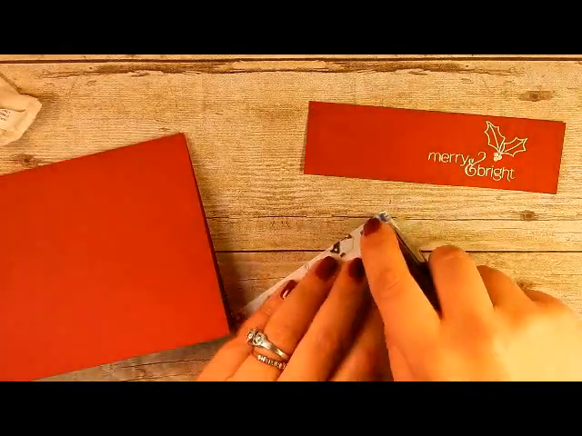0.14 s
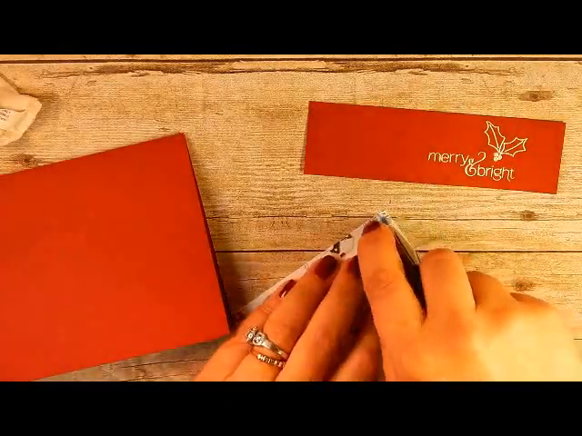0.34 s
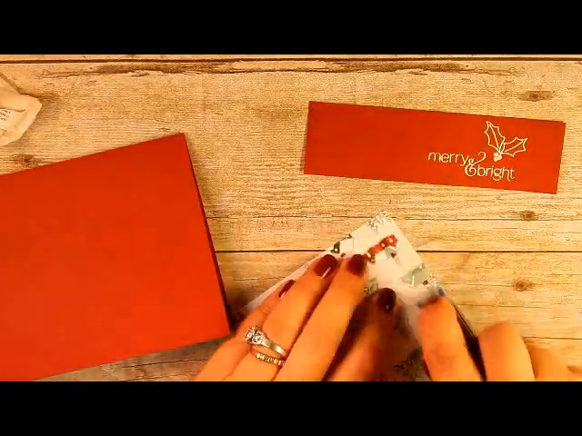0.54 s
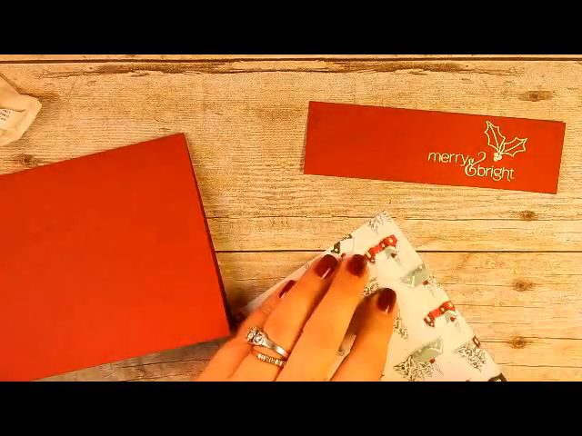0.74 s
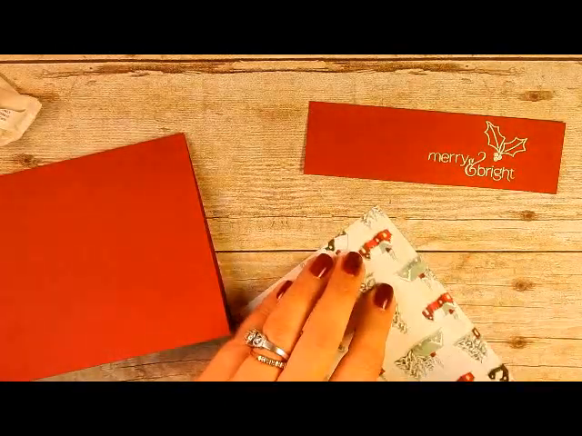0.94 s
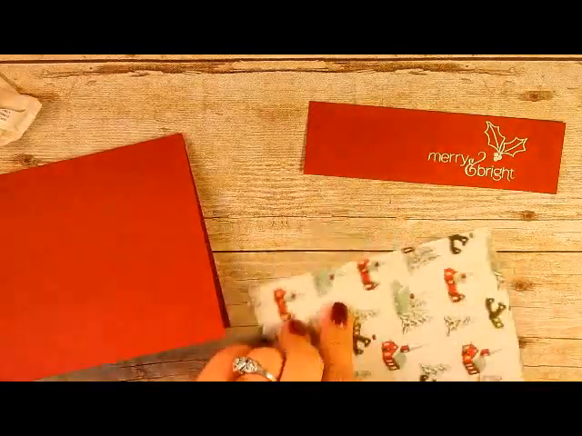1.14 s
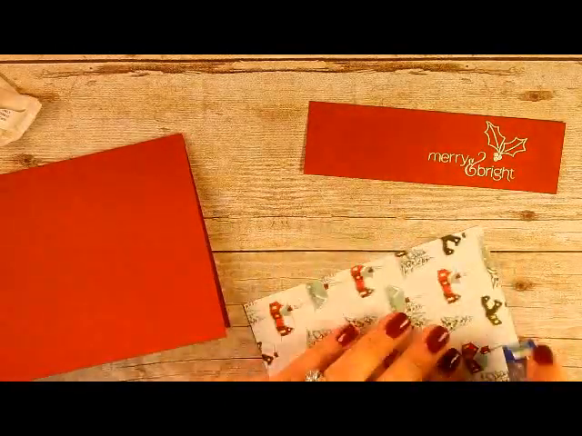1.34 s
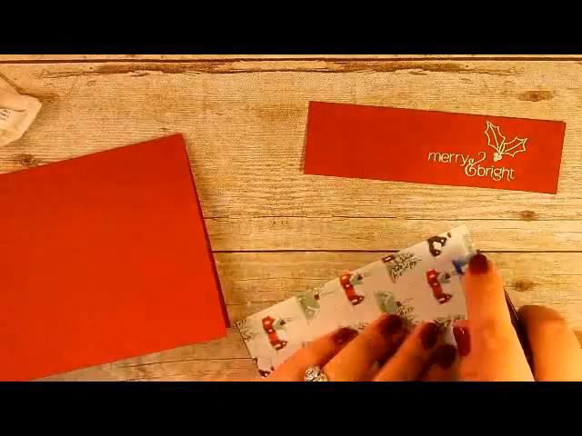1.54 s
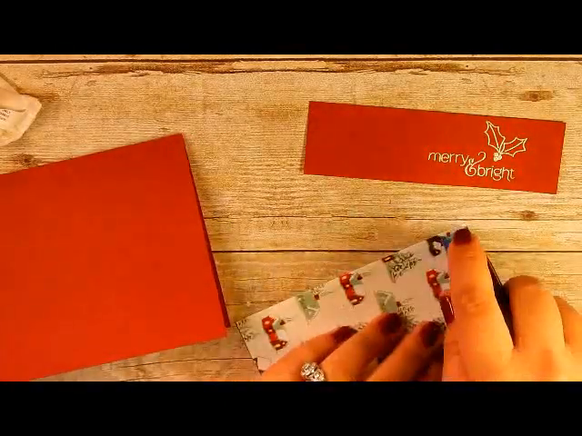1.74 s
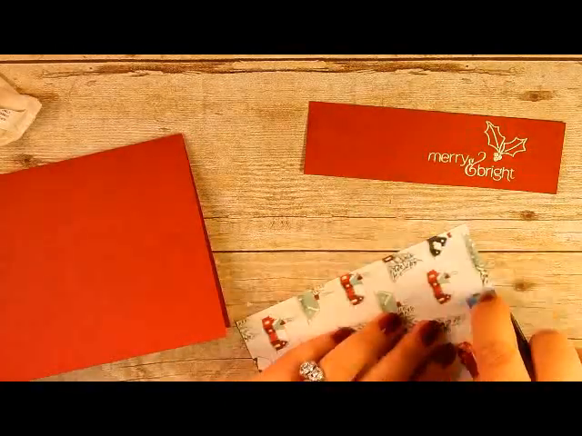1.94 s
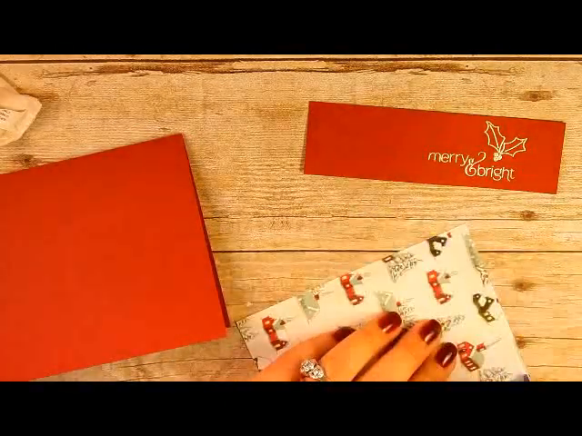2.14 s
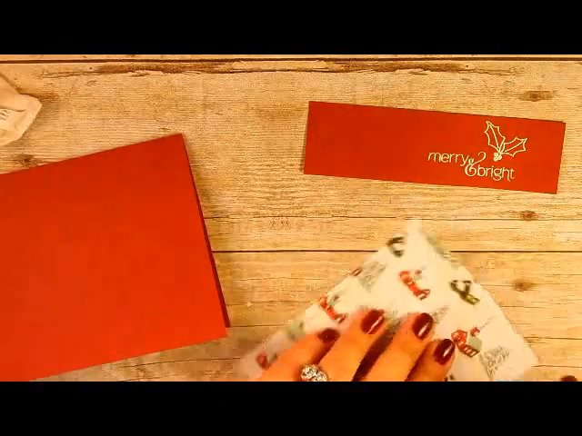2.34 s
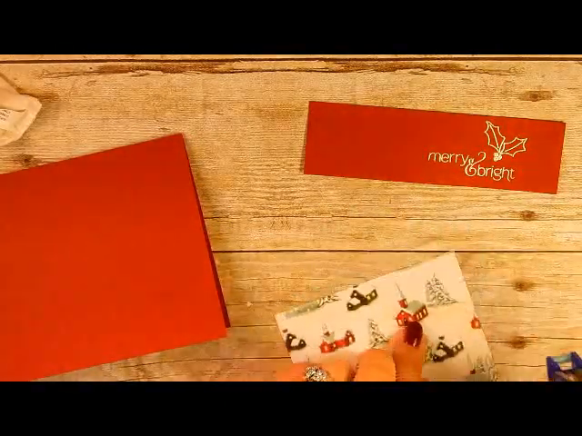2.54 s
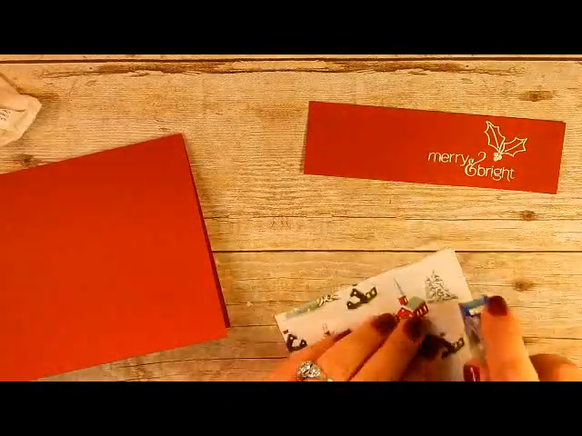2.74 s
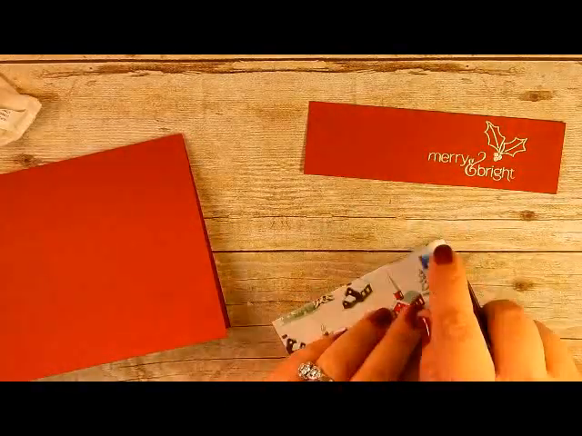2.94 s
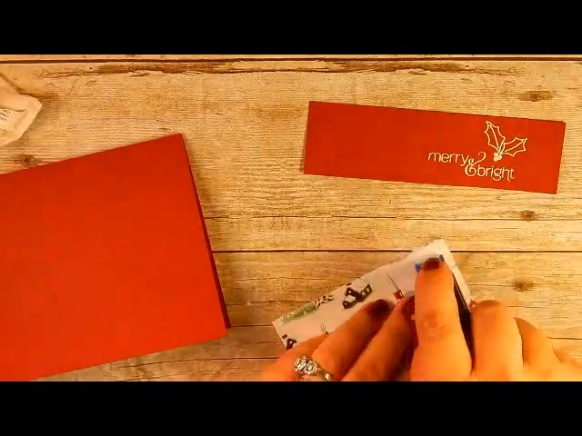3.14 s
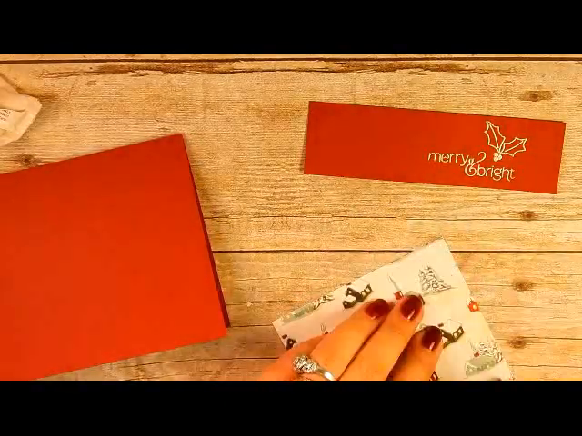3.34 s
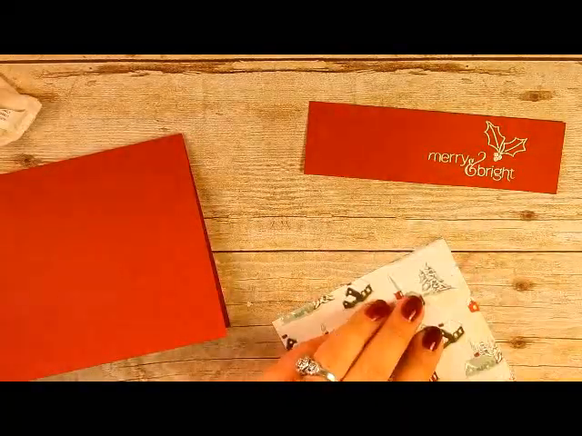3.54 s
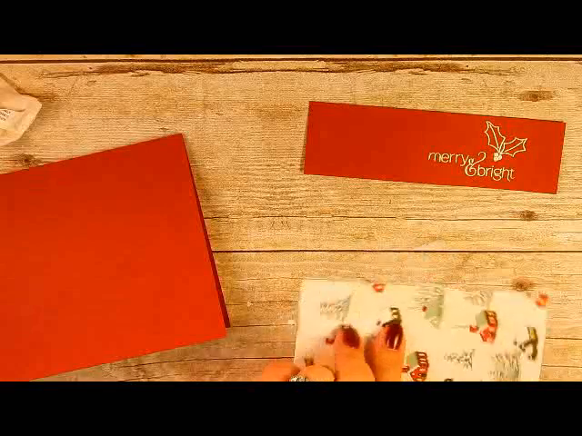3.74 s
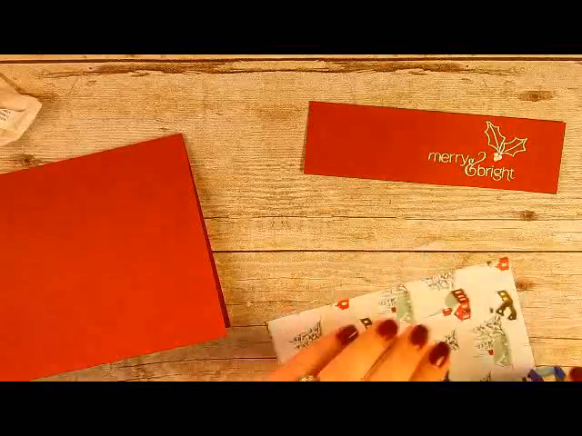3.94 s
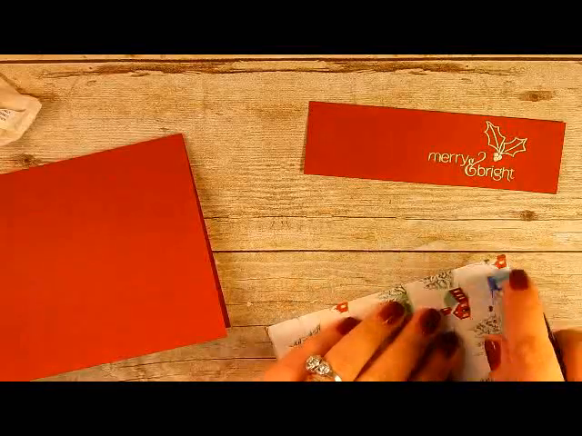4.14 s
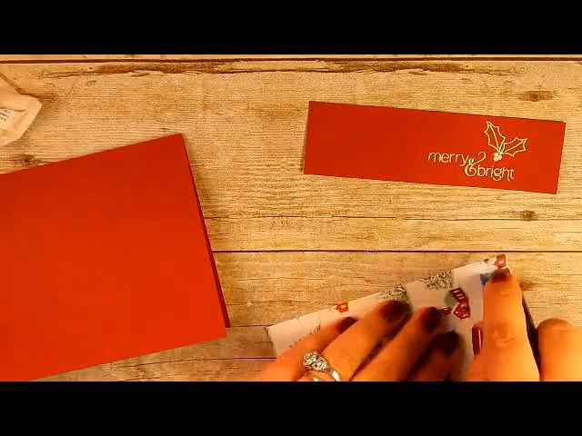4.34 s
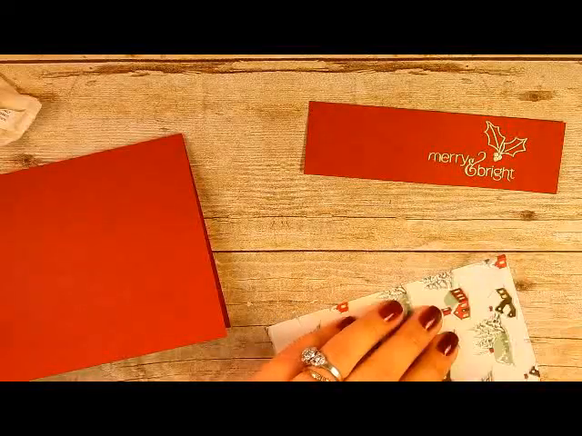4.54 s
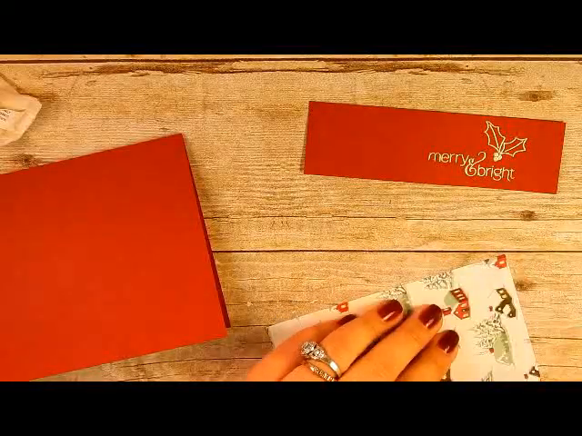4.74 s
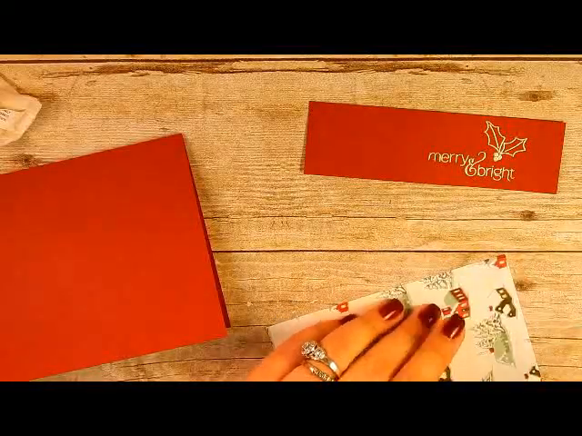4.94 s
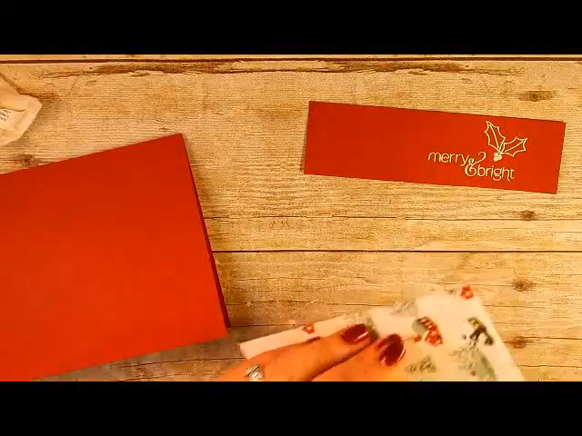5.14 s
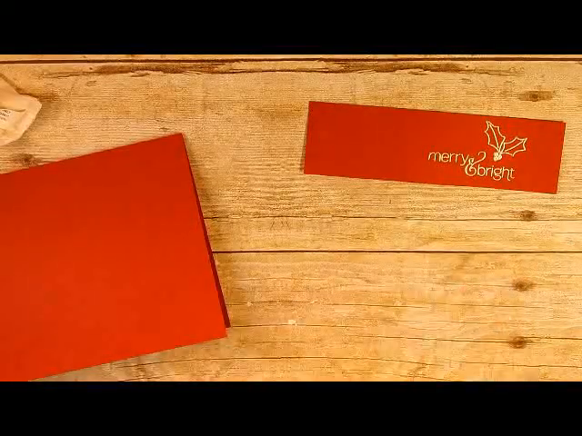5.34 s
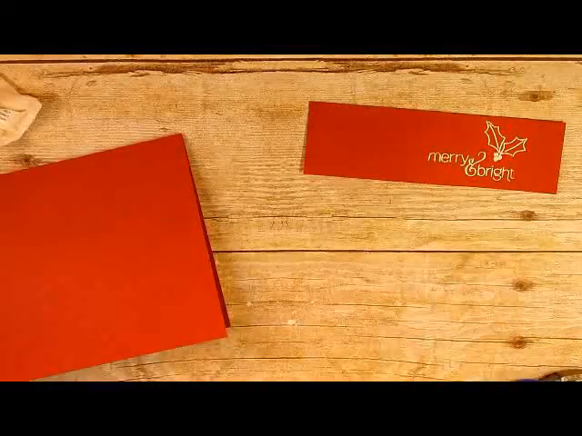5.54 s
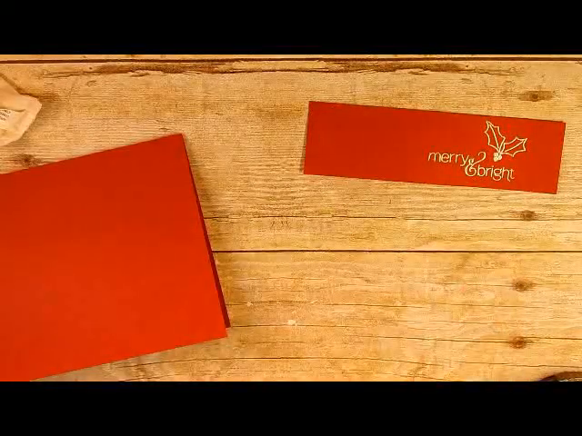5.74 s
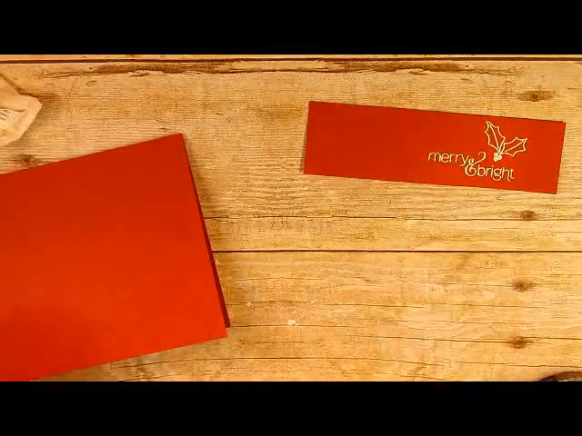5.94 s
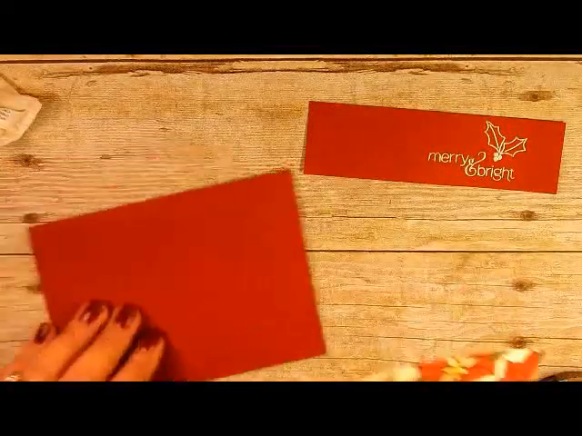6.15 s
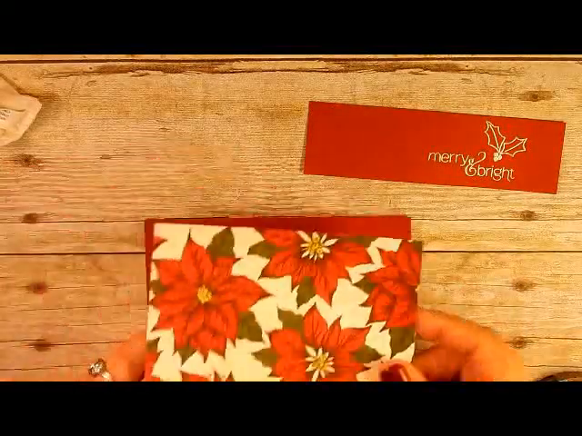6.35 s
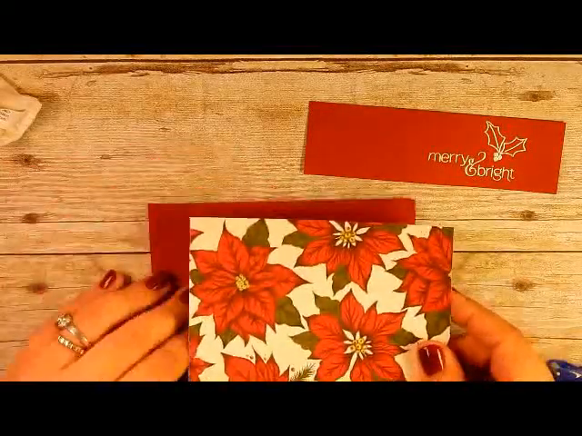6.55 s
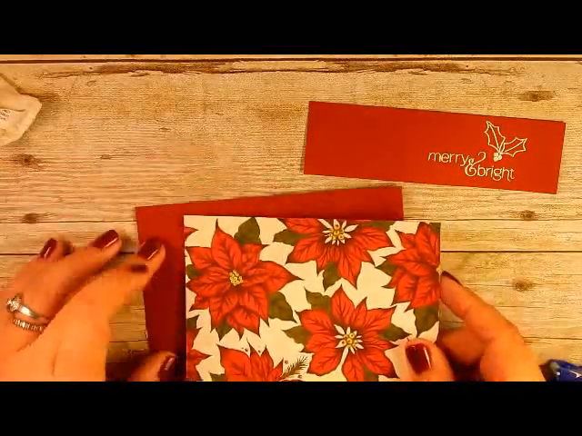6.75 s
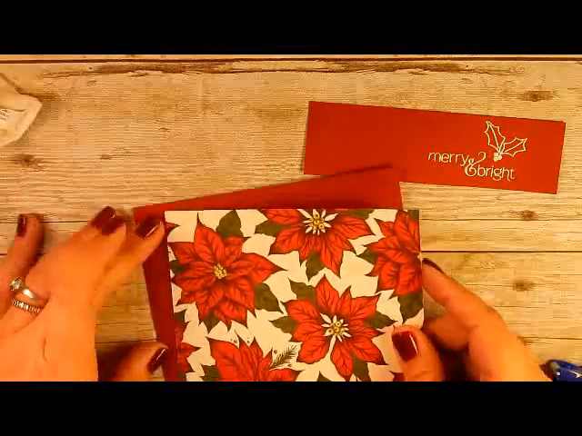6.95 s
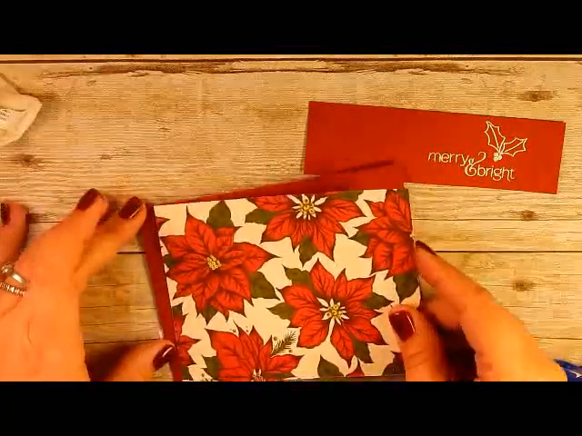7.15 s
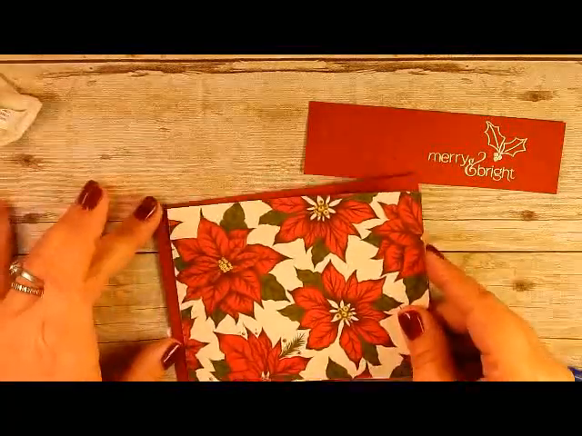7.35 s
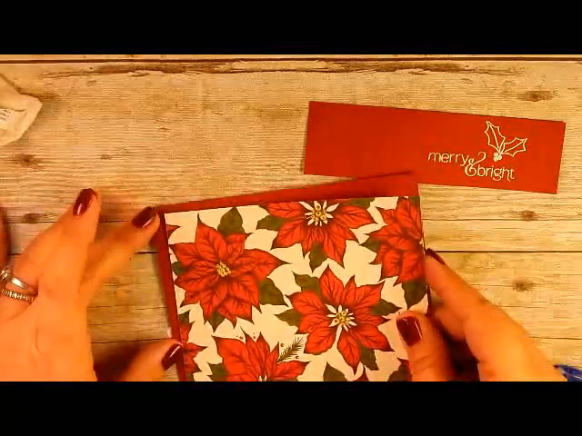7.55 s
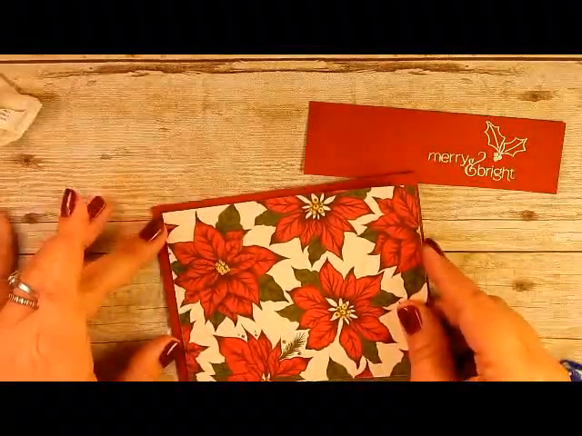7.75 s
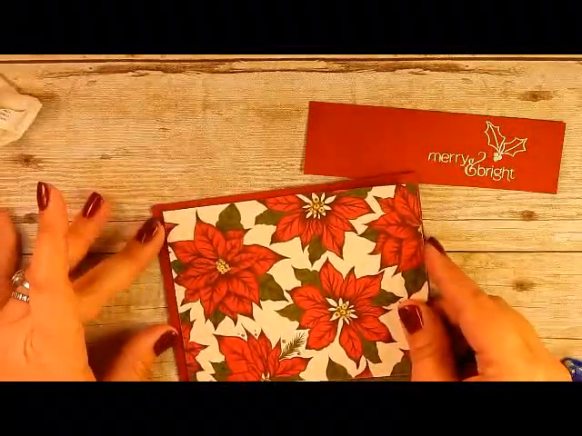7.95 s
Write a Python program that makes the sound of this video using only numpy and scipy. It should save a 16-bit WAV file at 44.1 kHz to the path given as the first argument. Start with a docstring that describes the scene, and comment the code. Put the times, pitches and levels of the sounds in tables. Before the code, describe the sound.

Very close in a small quiet room, a hollow plastic tape runner makes four brief ratcheting zips across paper, about a second apart, with light clicks and soft paper rustles between them. It is then dropped onto a wooden desk in a loud, quick clatter. Card taps and rubs the wood, paper swishes over card, and faint nudging rustles follow before a final soft thud.

```python
"""Card making at a desk

A plastic tape runner is pulled over a paper panel in four strokes, close to the microphone in a small room.
Noise shaped by gear teeth and adhesive rings through casing resonances; blows ring the struck bodies and the desk.
The panel is turned between strokes by clumped friction noise. Then the runner is put down on the wooden desk,
and the panel is slid onto a folded card and nudged into line, over quiet room air and a low hum."""
import sys
import numpy as np
from scipy import signal
from scipy.fft import rfft, irfft, next_fast_len
from scipy.io import wavfile
from scipy.ndimage import uniform_filter1d, map_coordinates

SR = 44100
rng = np.random.default_rng(int(sys.argv[2]) if len(sys.argv) > 2 else 0)


def dump_mix(stems):
    """Bounce the given channels to the path in sys.argv[1] as a 16-bit WAV at rate SR."""
    frames = np.atleast_2d(stems).T  # one column per channel
    limited = np.clip(frames, -1, 1)  # hard clip at full scale
    pcm = np.round(limited * 32767).astype(np.int16)
    wavfile.write(sys.argv[1], SR, pcm)


N = 352800
TIME = np.arange(N) / SR  # seconds
HZ = np.fft.rfftfreq(8192, 1 / SR)  # frequency grid of the resonant bodies


def amp(db):
    """Level: decibels to amplitude gain."""
    return 10 ** (np.asarray(db) / 20)


def unit(x):
    """Normalisation: scale to rms 1."""
    return x / np.sqrt(np.mean(x ** 2) + 1e-20)


def along(points, hz):
    """Logarithmic pitch: read (Hz, value) points on a log frequency axis."""
    point_hz, values = np.transpose(points)
    return np.interp(np.log(hz + 1), np.log(point_hz + 1), values)


def wobble(rate):
    """Slow modulation: a smooth random curve with rate knots a second."""
    knots = rng.standard_normal(int(N * rate / SR) + 4)
    return map_coordinates(knots, [TIME * rate])


def filtered(x, response):
    """Linear filtering: multiply the spectrum of x by a function of frequency."""
    size = next_fast_len(N + SR // 4)
    spectrum = rfft(x, size) * response(np.fft.rfftfreq(size, 1 / SR))
    return irfft(spectrum, size)[..., :N]


def coloured(x, spectrum):
    """Spectral shaping: x weighted by the given spectrum, at rms 1."""
    return unit(filtered(x, lambda hz: amp(along(spectrum, hz))))


def peaks(modes):
    """Modal resonance: summed power response of the modes; width is the full width at half power."""
    return sum(amp(db) ** 2 / (1 + (2 * (HZ - hz) / width) ** 2) for hz, width, db in modes)


def ringing(gain):
    """Minimum phase: the causal impulse response of energy 1 shaped by the gain on HZ."""
    cepstrum = irfft(np.log(np.maximum(gain / gain.max(), 1e-5)))
    # folding the cepstrum onto positive times makes the response causal
    cepstrum[1:len(HZ) - 1] *= 2
    cepstrum[len(HZ):] = 0
    ring = irfft(np.exp(rfft(cepstrum)))
    return ring / np.linalg.norm(ring)


def burst(t60, attack=0.0015):
    """Exponential decay: a dying noise of tiny contacts, of energy 1; times in seconds."""
    t = TIME[:SR // 5]
    decay = amp(-60 * t / max(t60, .002))
    x = rng.standard_normal(len(t)) * decay * (1 - np.exp(-t / attack))
    return x / np.linalg.norm(x)


def chatter(t60, clump_db=4, clump_rate=450):
    """Repeated impact: a burst broken into uneven rebounds, of energy 1."""
    x = burst(t60, attack=0.0016)
    knots = rng.uniform(-1, 1, 400)
    clumps = np.interp(TIME[:len(x)] * clump_rate, np.arange(len(knots)), knots)
    x = x * amp(clump_db * clumps)
    return x / np.linalg.norm(x)


def add(track, s, sound):
    """Superposition: mix a sound in at time s."""
    part = track[max(round(s * SR), 0):][:len(sound)]
    part += sound[:len(part)]


def patchy(x, depth_db, size):
    """Spectral fluctuation: bands swell and fade while loudness holds; size = (bins, frames) of a patch."""
    z = signal.stft(x, nperseg=512)[2]
    field = rng.standard_normal(z.shape)
    for _ in range(2):
        field = uniform_filter1d(field, size[0], axis=0)
        field = uniform_filter1d(field, size[1], axis=1)
    gain = amp(depth_db * unit(field))
    gain = gain / np.sqrt(uniform_filter1d(gain ** 2, size=25, axis=0))
    return signal.istft(z * gain, nperseg=512)[1][:N]


def swell(start, length, rise, fall):
    """Speed of the hand, 0 to 1: it gathers speed, holds and slows to rest."""
    up = np.clip((TIME - start) / rise, 0, 1)
    down = np.clip((start + length - TIME) / fall, 0, 1)
    return np.sin(np.pi / 2 * up) * np.sin(np.pi / 2 * down)


def movements(table):
    """Amplitude envelope: gain per sample of a series of hand movements."""
    return sum(amp(db) * swell(start, length, rise, fall) for start, length, db, rise, fall in table)


def friction(spectrum, grain_db=2.0):
    """Stick-slip friction: fibres catch and let go, giving noise in fine clumps at rms 1."""
    clumps = wobble(400) + 0.67 * wobble(45)
    return coloured(rng.standard_normal(N) * amp(grain_db * clumps), spectrum)


# Spectrum of the room air. Each row: frequency in Hz, relative level in dB per Hz.
AIR_SPECTRUM = [(20, -25), (45, -3), (70, -5.5), (110, -5.5), (200, -7), (350, -11), (700, -13.5),
                (1100, -16), (1500, -15.5), (1900, -18.5), (2600, -20.5), (4300, -25), (6500, -35),
                (10400, -45.5)]


def background(air_db=-59, hum_db=-66, hum_hz=60.4, apart_db=-6):
    """Diffuse field: partly independent room air at the two capsules, slightly shifting, and a low mains hum."""
    shared = coloured(patchy(rng.standard_normal(N), depth_db=.9, size=(5, 30)), AIR_SPECTRUM)
    diffuse = amp(apart_db) * coloured(rng.standard_normal((2, N)), AIR_SPECTRUM)
    hum = amp(hum_db + 3.1 * wobble(4.2)) * np.sin(2 * np.pi * hum_hz * TIME)
    return amp(air_db + 1.6 * wobble(6.2)) * (shared + diffuse) + hum


# The runner's tip or the card's edge scuffs briefly.
# Each row: middle in seconds, relative level in dB, resonance in Hz, length in seconds.
SCUFFS = [(0.23, -52, 1430, 0.044), (1.124, -44.5, 1550, 0.042), (1.91, -39, 1620, 0.038),
          (2.042, -46, 1560, 0.036), (3.238, -42.5, 1520, 0.042), (3.76, -44, 1482, 0.039),
          (4.426, -41, 1630, 0.013), (4.895, -42.5, 1450, 0.075), (5.498, -36, 1875, 0.023),
          (5.556, -21, 1380, 0.024), (5.603, -30, 1410, 0.044), (5.668, -21, 1810, 0.017),
          (5.922, -44, 1240, 0.025), (6.043, -39, 1730, 0.034), (6.09, -29, 1750, .04),
          (6.168, -54, 900, .04), (6.583, -27, 1440, 0.027), (6.633, -33.5, 1540, 0.056),
          (6.844, -40.5, 1800, .07), (6.923, -46, 1740, 0.029), (6.967, -43, 1720, 0.034),
          (7.403, -54, 1730, 0.028)]


def scuffs(width_hz=340):
    """Resonant friction: brief swelling scrapes, each of sparse grains through one broad resonance."""
    out = np.zeros(N)
    for s, db, hz, length in SCUFFS:
        envelope = np.hanning(int(length * SR))
        sparse = rng.random(len(envelope)) < 3000 / SR  # about 3000 grains a second
        grains = unit(rng.standard_normal(len(envelope)) * sparse)
        resonance = np.sqrt(peaks([(hz, width_hz, 0)]))
        body = ringing(resonance * HZ / (HZ + hz) / np.sqrt(1 + (HZ / 5000) ** 4))
        add(out, s - length / 2, amp(db) * signal.fftconvolve(envelope * grains, body))
    return out


# Resonances of the desk top. Each row: frequency in Hz, width in Hz, relative level in dB.
DESK_MODES = [(59.6, 19, 4.5), (110, 13, 4), (165, 150, -5.5), (210, 66, -0.5)]


def blows(table, colour, soft_hz, lowest_hz, knock_db):
    """Impact excitation: a contact thumps the desk, deeper if soft, and rings the object in three bands."""
    below = lambda hz: 1 / np.sqrt(1 + (HZ / hz) ** 10)
    above = lambda hz: np.sqrt(1 - below(hz) ** 2)
    bands = [above(320) * below(1100), above(1100) * below(4000), above(4000)]
    thump = np.sqrt(peaks(DESK_MODES) / (1 + (HZ / soft_hz) ** 4))
    desk = ringing(thump * below(500) * above(lowest_hz))
    bodies = [ringing(colour * band) for band in bands]
    out = np.zeros(N)
    for s, clack_db, thud_db, bright_db, t60 in table:
        add(out, s + 0.0013, amp(thud_db) * desk)
        contact = chatter(t60)
        for body, band_db in zip(bodies, (knock_db, 0, bright_db)):
            ring = signal.fftconvolve(contact, body)
            add(out, s + .0005, amp(clack_db + band_db) * ring / np.linalg.norm(ring))
    return out


# The runner is gripped, pressed on, lifted and finally put down.
# Each row: time in seconds, relative clack level in dB, relative desk thud level in dB,
# high band against the middle band in dB, contact decay (t60) in seconds.
RUNNER_CONTACTS = [(0.339, -25.5, -31, -2.5, 0.021), (0.548, -26.5, -35, -4, 0.051),
                   (1.095, -30.5, -26.5, 16, 0.03), (1.874, -18.5, -16.5, -1.5, 0.14),
                   (2.026, -17, -24, -5, 0.24), (2.438, -16.5, -23, 1.5, 0.1), (3.21, -12, -5, -6.5, 0.055),
                   (3.32, -19.5, -33, -4, 0.15), (3.721, -17, -29, -1, 0.021),
                   (4.408, -18.5, -16.5, -8.5, 0.052), (4.494, -21.5, -44, -12, 0.036),
                   (4.887, -22, -27, 5.5, 0.052), (5.071, -17.5, -41.5, -1, 0.028),
                   (5.141, -23.5, -29.5, 0.5, 0.049), (5.189, -11, -25, -6.5, 0.049),
                   (5.314, -20, -27, -15.5, 0.039), (5.502, 1.5, -5.5, -1, 0.074),
                   (5.551, 7, -4.5, -4.5, 0.019), (5.588, 0.5, -6, 0, 0.059), (5.663, 4, -29, -5, 0.02),
                   (5.71, -10, -18, 0.5, 0.04), (5.789, -17.5, -40, -1, 0.02)]
# Spectrum of the plastic clack. Each row: frequency in Hz, relative level in dB per Hz.
CLACK_SPECTRUM = [(200, -17.5), (370, -18.5), (520, -28), (750, -19), (940, -11.5), (1100, -10),
                  (1370, -0.5), (1580, -7.5), (1830, 4), (2200, 5.5), (3400, -2.5), (4500, -8.5),
                  (6300, -15.5), (10400, -28)]
# Resonances of the plastic casing. Each row: frequency in Hz, width in Hz, relative level in dB.
CASING_MODES = [(1470, 90, 5.5), (1520, 33, 9.5), (1630, 20, 14.5), (1822, 90, 4), (2295, 180, 2),
                (2730, 350, 2), (3120, 62, 0.5), (3100, 74, 3.5), (3940, 200, 2), (4220, 60, 0),
                (4640, 80, -11), (4900, 80, -7), (5400, 72, -6.5), (5570, 130, -6), (6470, 83, -5),
                (8000, 220, 0.5), (9400, 190, 3)]


def runner_handling():
    """Impact on a hollow body: the runner clacks with its casing resonances."""
    plastic = amp(along(CLACK_SPECTRUM, HZ)) * np.sqrt(1 + peaks(CASING_MODES))
    return blows(RUNNER_CONTACTS, plastic, soft_hz=258, lowest_hz=66, knock_db=-4.5)


START_SPEED = 0.3  # share of full speed at which the gear starts and stops turning
LOUDNESS_POWER = 0.99  # amplitude grows with speed to this power
PRESSURE_DB, PRESSURE_RATE = 2.14, 25  # the hand presses unevenly: depth, changes a second
BRIGHT_WITH_SPEED_DB = 1  # treble gained from rest to full speed
# The four pulls of the runner. Each row: start in seconds, length in seconds, relative level in dB,
# speeding up in seconds, slowing down in seconds, brightness in dB, hollowness in dB.
STROKES = [(0.617, 0.335, -22, 0.12, 0.11, 1, -1), (2.066, 0.25, -22.5, 0.075, 0.13, 0, -2),
           (3.364, 0.305, -25.5, 0.05, 0.08, 2, 3), (4.569, 0.23, -22.5, 0.051, 0.16, 0, -1)]


def pulls():
    """Speed-dependent excitation: speed, strength, treble gain and hollow gain of the runner in each pull."""
    speed, strength = np.full(N, START_SPEED), np.zeros(N)
    bright_db, hollow_db = np.zeros(N), np.zeros(N)
    for start, length, db, rise, fall, treble_db, ring_db in STROKES:
        hand = swell(start, length, rise, fall)
        speed = speed + (1 - START_SPEED) * hand
        strength += amp(db) * speed ** LOUDNESS_POWER * (hand > 0)
        near = abs(TIME - start - length / 2) < length
        bright_db += near * (treble_db + BRIGHT_WITH_SPEED_DB * (hand - 1))
        hollow_db += near * ring_db
    pressure = amp(PRESSURE_DB * wobble(PRESSURE_RATE))
    return speed, strength * pressure, amp(bright_db), amp(hollow_db)


# Hard single slips of the gear, clearest as a pull starts and stops.
# Each row: time in seconds, relative level in dB.
SLIPS = [(0.61, -20), (0.631, -16), (0.644, -10.5), (0.753, -15), (0.897, -16.5), (0.905, -11),
         (0.967, -15), (2.059, -17), (2.071, -15.5), (2.122, -7), (2.153, -10), (2.165, -12), (2.235, -8),
         (2.253, -20), (2.315, -13.5), (3.353, -16), (3.367, -13.5), (3.617, -12), (3.658, -17.5),
         (3.678, -15), (4.538, -13), (4.558, -13.5), (4.575, -10.5), (4.598, -11.5), (4.795, -14.5)]


def gear_rattle(speed, top_rate=175, scatter=0.00072, size_db=1.34, tooth_t60=0.02):
    """Periodic impact: teeth slip at a rate set by the hand's speed, each with a short chatter; rms 1."""
    turned = np.cumsum(top_rate * speed) / SR  # teeth passed so far
    teeth = np.flatnonzero(np.diff(np.floor(turned)))
    chance = rng.standard_normal((len(teeth), 2))
    places = np.clip(teeth + scatter * SR * chance[:, 0], 0, N - 1).astype(int)
    sizes = amp(size_db * np.clip(chance[:, 1], -2, 2))
    # dividing by speed evens out the power; the strength of the pull sets the loudness
    energy = np.bincount(places, sizes ** 2 / speed[teeth], N)
    # a hard slip takes the place of the nearest tooth
    for s, _ in SLIPS:
        at = int(s * SR)
        reach = int(0.6 * SR / (top_rate * speed[at]))
        energy[at - reach:at + reach] = 0
    t = TIME[:SR // 20]
    tooth = amp(-60 * t / tooth_t60) * (1 - np.exp(-t / 0.0024))
    power = signal.fftconvolve(energy, tooth ** 2)[:N]
    return unit(np.sqrt(abs(power)) * rng.standard_normal(N))


# Spectrum of the gears. Each row: frequency in Hz, relative level in dB per Hz.
GEAR_SPECTRUM = [(40, -23), (100, -12), (220, -20), (400, -23), (620, -26.5), (900, -16.5), (1300, -4.5),
                 (2100, -6), (3000, -2.5), (4400, -1), (5400, 0), (6200, -5.5), (7500, -10), (10400, -22.5)]


def tape_runner(rattle_db=-2, peel_db=-12, slip_db=12):
    """Source and resonator: gear teeth, peeling adhesive and hard slips all sound through the casing."""
    speed, pull, bright, hollow = pulls()
    # the adhesive crackles: about 3000 random clicks a second
    peel = unit(rng.standard_normal(N) * (rng.random(N) < 3000 / SR))
    drive = pull * (amp(rattle_db) * gear_rattle(speed) + amp(peel_db) * peel)
    for s, db in SLIPS:
        add(drive, s, amp(db + slip_db) * burst(t60=0.017, attack=0.0027))
    # the colour shifts as the tip travels over the paper
    drive = patchy(drive, depth_db=2.2, size=(3, 5))
    casing = ringing(amp(along(GEAR_SPECTRUM, HZ)) * np.sqrt(1 + peaks(CASING_MODES)))
    sound = signal.fftconvolve(drive, casing)[:N]
    # the angle and pressure of the tip trade treble against the casing's hollow ring
    treble = filtered(sound, lambda hz: 1 - 1 / (1 + (hz / 4800) ** 6))
    low = filtered(sound, lambda hz: 1 / (1 + (hz / 2300) ** 6))
    return sound + treble * (bright - 1) + low * (hollow - 1)


# The panel is swivelled on the wood.
# Each row: start in seconds, length in seconds, relative level in dB, rise in seconds, fall in seconds.
TURNS = [(1.11, 0.098, -56.5, 0.013, 0.069), (1.19, 0.082, -50.5, 0.027, 0.05),
         (1.245, 0.15, -44, 0.084, 0.072), (1.6, 0.079, -56, 0.03, 0.061), (2.49, 0.32, -48, 0.083, 0.21),
         (3.8, 0.26, -48, 0.037, 0.12)]
# Spectrum of paper on wood. Each row: frequency in Hz, relative level in dB per Hz.
PAPER_ON_WOOD = [(530, -42), (900, -9), (1250, -6.5), (1550, -23), (1810, -3.5), (6170, -3), (7810, 4),
                 (10400, -3), (13500, -72), (22000, -120)]


def panel_turns():
    """Sliding friction: paper fibres rub on the wood as the panel is turned."""
    return movements(TURNS) * friction(PAPER_ON_WOOD)


# Fingers and card land on the desk.
# Each row: time in seconds, relative clack level in dB, relative desk thud level in dB,
# high band against the middle band in dB, contact decay (t60) in seconds.
LANDINGS = [(1.567, -24.5, -8, 3.5, 0.03), (1.594, -31, -12.5, -14, 0.036), (1.641, -35, -16.5, -4.5, 0.02),
            (2.948, -27.5, -19, 2, 0.2), (4.215, -28.5, -19.5, 2.5, 0.035), (6.051, 1, -24, -2, 0.021),
            (6.062, 0, -23, -29, 0.026), (6.084, -1.5, -30, -36, 0.039), (6.23, -6, -19, -10.5, 0.085),
            (6.427, -11, -40, 2.5, 0.029), (6.573, -13, -17, 0, 0.018), (6.588, -10.5, -28, 1.5, 0.085),
            (6.624, -12, -21, 2.5, 0.26), (7.099, -26.5, -22.5, -15, 0.02), (7.33, -26, -37, 1, 0.031),
            (7.497, -24.5, -31, -4, 0.12), (7.996, -11.5, -1, -18, 0.028)]
# Spectrum of the landing card. Each row: frequency in Hz, relative level in dB per Hz.
CARD_SPECTRUM = [(120, -19), (200, 12.5), (283, -6.5), (428, -22), (488, -11), (751, -6.5), (829, -5),
                 (1610, -7.5), (1860, -2), (2550, -1.5), (2820, -5), (4630, -17), (10400, -34),
                 (13500, -66), (22000, -120)]


def card_landings():
    """Soft impact: fingers and card land more dully than the hollow runner."""
    return blows(LANDINGS, amp(along(CARD_SPECTRUM, HZ)), soft_hz=139, lowest_hz=42.2, knock_db=-3.5)


# The paper's edge flicks off a nail or off the adhesive. Each row: time in seconds, relative level in dB.
FLICKS = [(2.468, -32), (2.488, -23.5), (2.5, -25), (3.747, -36), (3.848, -36), (3.915, -36),
          (4.896, -27.5), (4.932, -29.5), (4.972, -28), (6.012, -42), (6.43, -23.5), (7.784, -21)]
# Spectrum of a flick. Each row: frequency in Hz, relative level in dB per Hz.
FLICK_SPECTRUM = [(180, -53), (300, -21), (1110, -18.5), (1420, -7.5), (2990, -14), (3320, -5.5),
                  (4740, -6.5), (5830, 0.5), (10400, -15), (13500, -51), (22000, -120)]


def paper_flicks(flick_db=14):
    """Sudden release: short bright snaps of the paper's edge."""
    drive = np.zeros(N)
    for s, db in FLICKS:
        add(drive, s + 0.00097, amp(db + flick_db) * burst(t60=0.016))
    return signal.fftconvolve(drive, ringing(amp(along(FLICK_SPECTRUM, HZ))))[:N]


# A hand brushes over the card as it reaches in, then paper slides over card. # Each row: start in seconds,
# length in seconds, relative level in dB, rise in seconds, fall in seconds.
SLIDES = [(5.2, 0.29, -53.5, 0.18, 0.01), (6.235, 0.23, -37, 0.085, 0.051), (6.42, 0.18, -47, 0.023, 0.11)]
# Spectrum of paper on card. Each row: frequency in Hz, relative level in dB per Hz.
PAPER_ON_CARD = [(350, -77), (600, -18), (637, -16), (1290, -12), (2260, 0.5), (2480, -2), (3550, 2),
                 (7180, -0.5), (10400, -9), (13500, -62), (22000, -120)]


def hand_and_panel_slides():
    """Sliding friction: a hand brushes over the card as it reaches in, then paper fibres rub on the card."""
    return movements(SLIDES) * friction(PAPER_ON_CARD)


# The card is dragged flat on the wood.
# Each row: start in seconds, length in seconds, relative level in dB, rise in seconds, fall in seconds.
DRAGS = [(5.9, 0.072, -48, 0.0066, 0.09), (6.06, 0.072, -40.5, 0.042, 0.05),
         (6.135, 0.088, -45, 0.047, 0.02), (6.228, 0.033, -42, 0.0089, 0.04)]
# Spectrum of the dragged card. Each row: frequency in Hz, relative level in dB per Hz.
RUB_SPECTRUM = [(100, -20), (200, -5.5), (350, 9.5), (450, 0.5), (800, -2), (1100, -8), (1500, -24),
                (3000, -35), (6000, -60)]


def card_drags():
    """Sliding friction: flat card on wood gives a low, dull rub."""
    return movements(DRAGS) * friction(RUB_SPECTRUM)


# Fingertips nudge the panel into line.
# Each row: start in seconds, length in seconds, relative level in dB, rise in seconds, fall in seconds.
NUDGING = [(6.7, 0.97, -58.5, 0.077, 0.31)]
# Spectrum of the rustle. Each row: frequency in Hz, relative level in dB per Hz.
RUSTLE_SPECTRUM = [(530, -28.5), (900, -12), (1440, -32), (1610, -6.5), (2310, -4), (2450, -10),
                   (2750, -9.5), (10400, -17), (13500, -60), (22000, -120)]


def panel_nudges(swing_db=4, rate=22):
    """Modulated friction: small pushes come and go at random, with rate knots a second."""
    return movements(NUDGING) * amp(swing_db * wobble(rate)) * friction(RUSTLE_SPECTRUM)


# Reverberation of the small room. Each row: frequency in Hz, decay time (t60) in seconds.
ROOM_DECAY = [(100, 0.49), (500, 0.26), (1700, 0.29), (4000, 0.21), (10000, 0.16)]


def room(x, wet_db):
    """Reverberation: a noise tail in which each frequency dies at its own speed."""
    hz, t, z = signal.stft(rng.standard_normal(SR // 2), SR, nperseg=256)
    decay = amp(-60 * t / along(ROOM_DECAY, hz)[:, None])
    z = z * decay * (hz > 100)[:, None]
    tail = signal.istft(z, SR, nperseg=256)[1]
    tail = tail * (1 - np.exp(-np.arange(len(tail)) / SR / 0.0033))  # soft onset
    return x + amp(wet_db) * signal.fftconvolve(x, tail / np.linalg.norm(tail))[:N]


def capsules(x, width, direct=0.5, reflected=0.71, reflection_t60=0.014):
    """Phase difference: direct sound and early reflections, turned a quarter cycle, set two capsules apart."""
    heard = direct * x + reflected * signal.fftconvolve(x, burst(reflection_t60))[:N]
    side = filtered(heard, lambda hz: 1j * amp(along(width, hz)))
    return np.array([x + side, x - side])


# Difference between the capsules for the runner's tip, then for elsewhere on the desk.
# Each row: frequency in Hz, relative level of the side signal in dB.
RUNNER_WIDTH = [(100, -6.5), (340, -7), (800, -29), (1900, -36), (4500, -17), (7000, -12.5), (10400, -5)]
DESK_WIDTH = [(60, -14), (250, -15), (700, -19), (1900, -21), (4500, -16), (9000, -7)]


def scene(left_db=0.55):
    """Superposition: all the work happens near the centre, a little to the left."""
    runner = capsules(room(tape_runner(), wet_db=-9.0), RUNNER_WIDTH)
    contacts = scuffs() + runner_handling() + card_landings()
    paper = panel_turns() + paper_flicks() + hand_and_panel_slides() + card_drags() + panel_nudges()
    desk = capsules(room(contacts, wet_db=-7.5) + room(paper, wet_db=-11.5), DESK_WIDTH)
    return (background() + runner + desk) * amp([[left_db], [-left_db]])


def record(dry, notch_hz=2500, notch_half_width_hz=45, top_hz=10480):
    """Band limiting: the microphone has one narrow notch and a steep upper limit."""
    notch = lambda hz: 1j * (hz - notch_hz) / (1j * (hz - notch_hz) + notch_half_width_hz)
    return filtered(filtered(dry, notch), lambda hz: 1 / (1 + (hz / top_hz) ** 120))


dry = scene()
out = record(dry)
dump_mix(out)
```